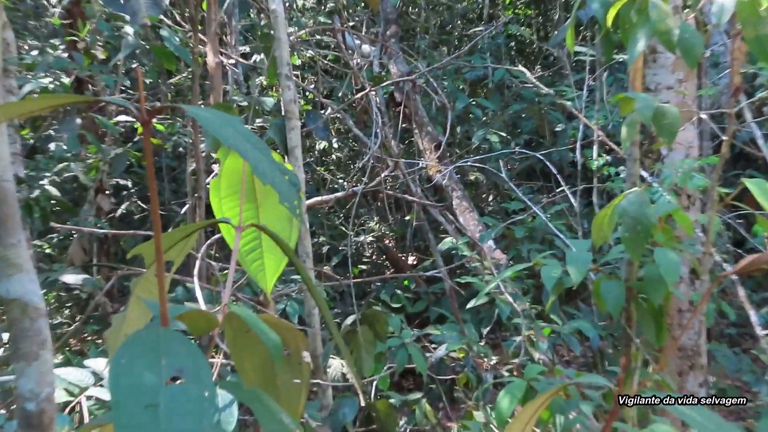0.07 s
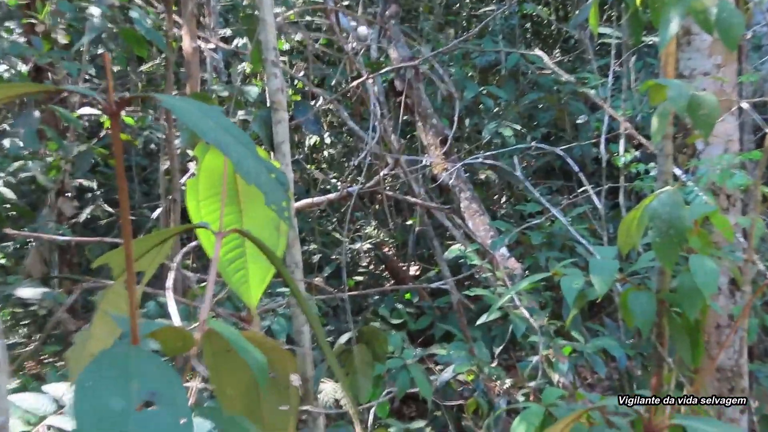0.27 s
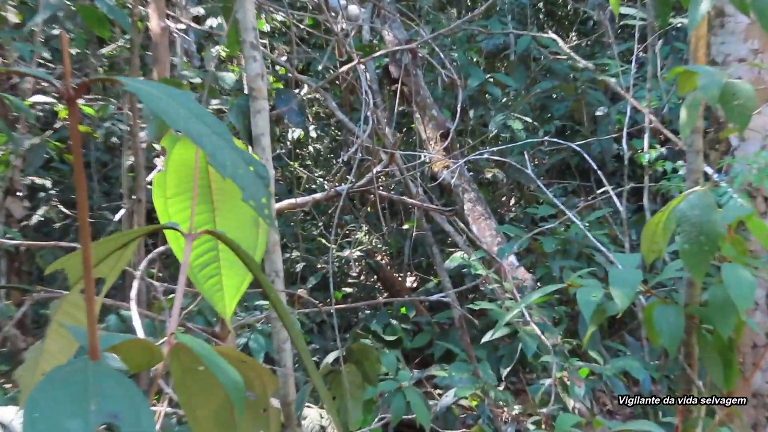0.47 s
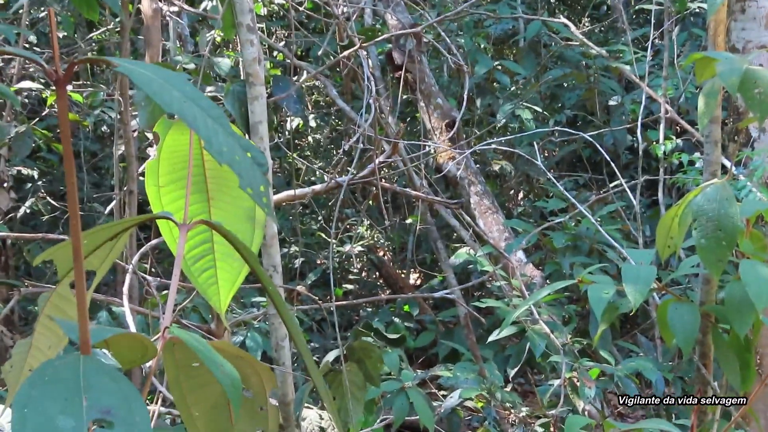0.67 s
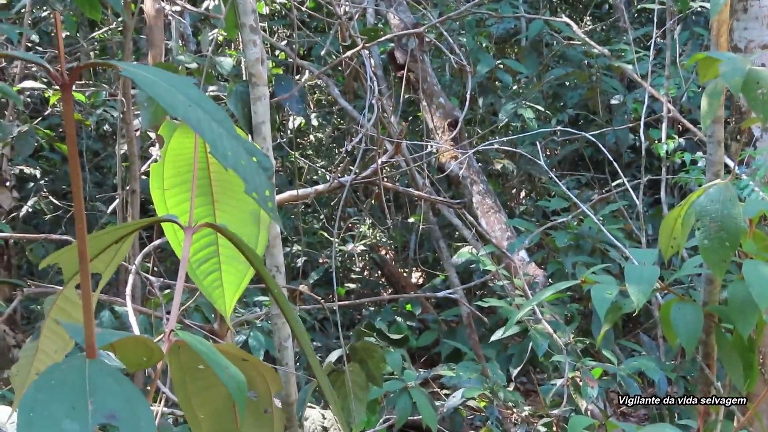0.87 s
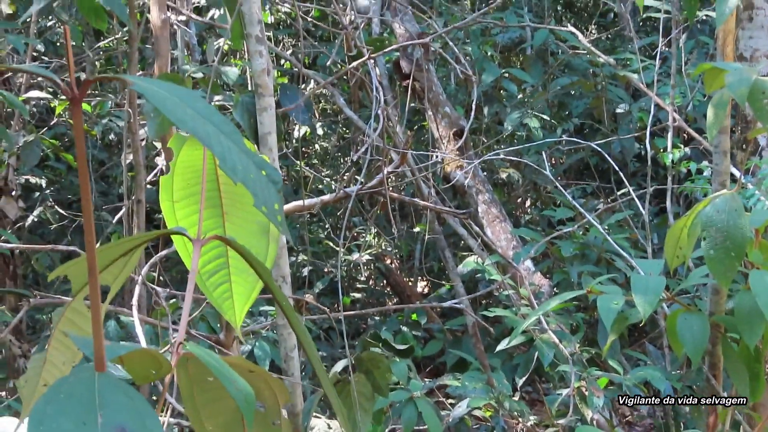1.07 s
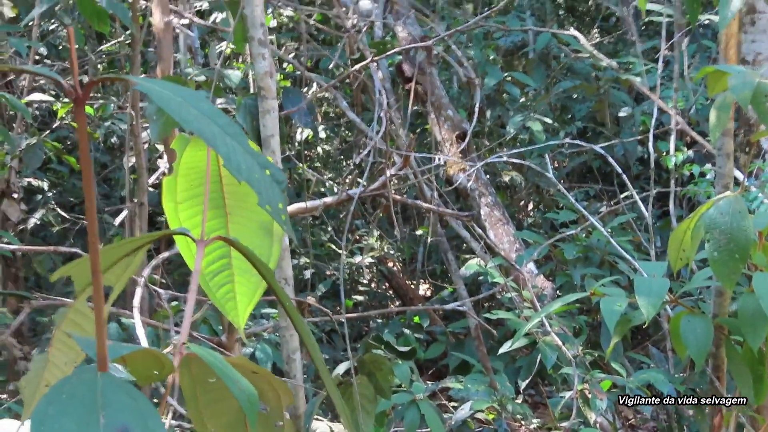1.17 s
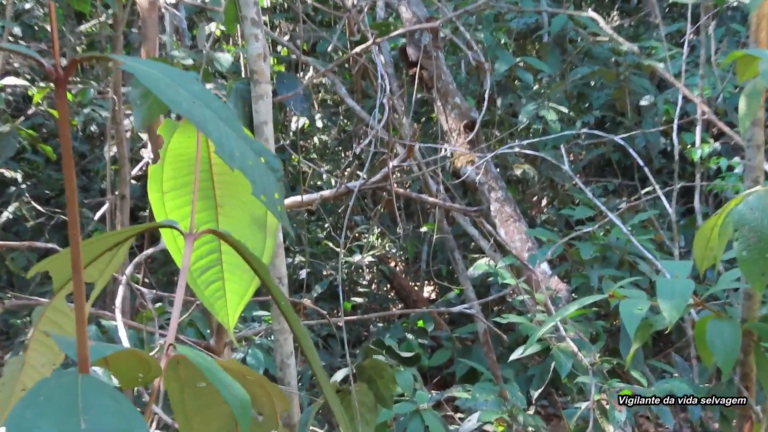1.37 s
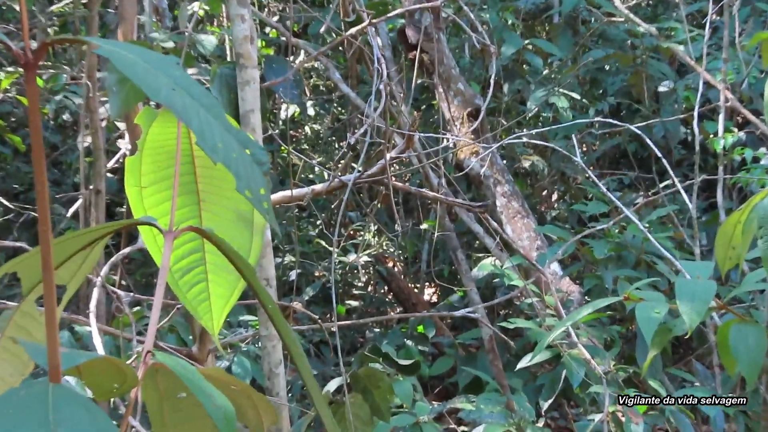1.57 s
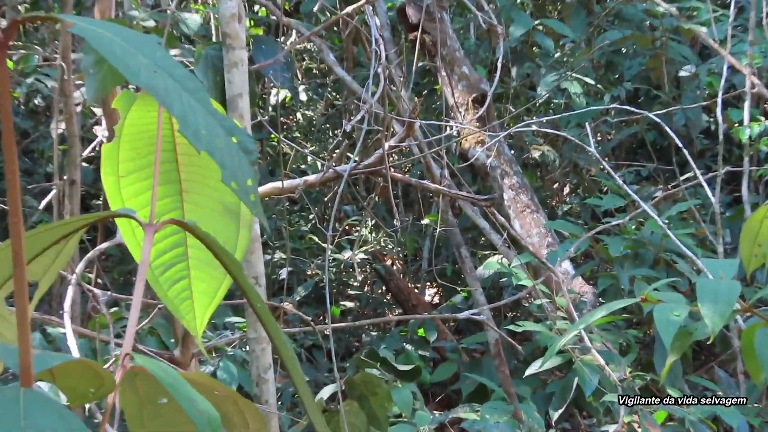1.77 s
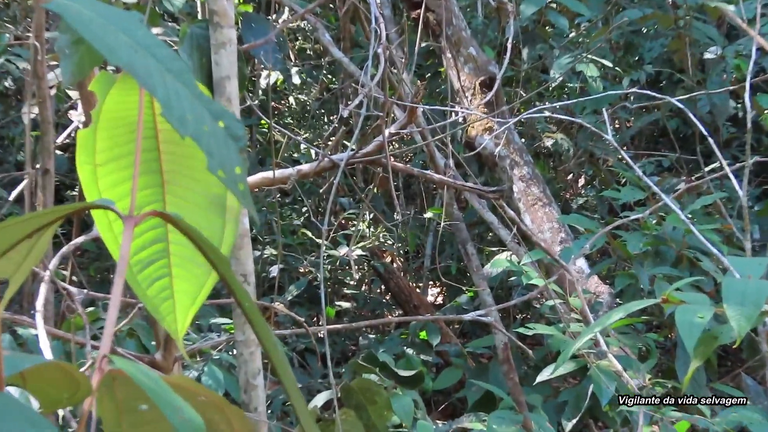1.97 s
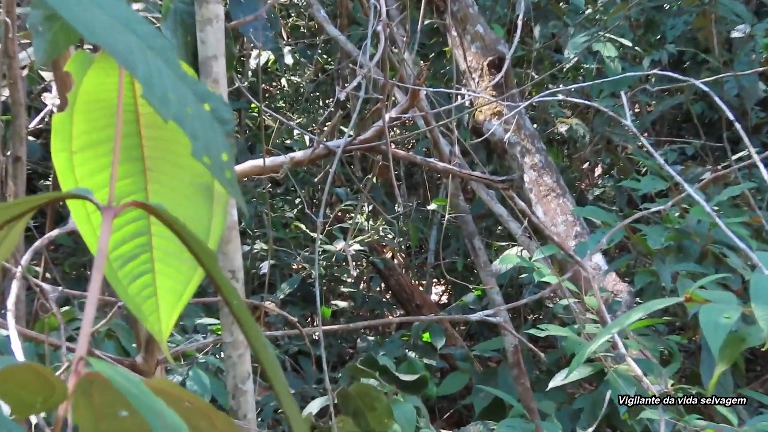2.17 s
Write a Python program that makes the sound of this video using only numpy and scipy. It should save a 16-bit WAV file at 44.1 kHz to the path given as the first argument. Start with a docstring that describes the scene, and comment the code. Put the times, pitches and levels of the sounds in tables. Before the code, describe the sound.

Small monkeys squeak and chuck in quick bursts among trees, over faint insects and leaf rustle

```python
"""A forest: monkeys call in thin whistles, falling buzzy chucks and low grunts, and once a twig snaps.
Whistles are near sines, chucks are partials smeared by noise, grunts are wavering tones with a rasp.
The trees return a long diffuse tail, made of decaying noise. A throbbing cricket tone and a cicada band
of filtered clicks sing over shaped noise for the hush, the rustle of leaves and the low rumble
of a hand-held camera, with a few soft bumps."""
import sys
import numpy as np
from scipy import signal
from scipy.fft import rfft, irfft
from scipy.io import wavfile
from scipy.ndimage import uniform_filter1d

SR = 44100
rng = np.random.default_rng(int(sys.argv[2]) if len(sys.argv) > 2 else 0)


def put_to_file(sound):
    """Save the sound as 16-bit audio at rate SR, in the file named by the first command-line argument."""
    columns = np.atleast_2d(sound).T  # one column per channel
    safe = np.clip(columns, -1, 1)
    whole_steps = np.round(safe * 32767)
    wavfile.write(sys.argv[1], SR, whole_steps.astype(np.int16))


def convert_level_to_amplitude(level_db):
    """Map a level in decibels to its linear amplitude factor."""
    exponent = np.asarray(level_db, float) / 20
    return 10 ** exponent


N = 99225

# Colour of the hush: (frequency [Hz], relative density [dB])
HUSH_COLOUR = [(15, -45), (30, 3), (60, -6), (130, -2), (400, -3.5), (540, -24), (720, -29), (1500, -41),
               (3000, -42), (5300, -67), (8000, -63), (9500, -72), (15500, -80)]
# Likeness of left and right in the air: (frequency [Hz], likeness [0-1])
AIR_LIKENESS = [(60, 1), (130, 0.75), (290, 0.16), (640, 0.8), (1410, 0.95), (3100, 0.82), (6820, 0.41),
                (15000, 0.09)]
# Rumble, the bass of the air: (time [s], level [dB])
RUMBLE_LEVEL = [(0.0, -46.5), (0.4, -47.5), (0.6, -39.5), (0.73, -53), (0.95, -48.5), (2.25, -49.5)]
# Rustle of leaves: (time [s], level [dB])
RUSTLE_LEVEL = [(0, -49), (.72, -54), (.74, -39.5), (.85, -42.5), (1.0, -41), (1.3, -38), (1.45, -39.5),
                (1.6, -43), (2.25, -51.5)]
# Colour of the rustle: (frequency [Hz], relative density [dB])
RUSTLE_COLOUR = [(500, 0.5), (1500, 0), (5000, -1.5), (8000, -9.5), (11000, -22), (15500, -17)]
# Cricket tone before its throb: (time [s], level [dB])
CRICKET_LEVEL = [(0, -55.5), (.3, -56), (0.549, -46), (.7, -54.5), (1.4, -49.5), (1.9, -54), (2.05, -50),
                 (2.25, -51.5)]
# Throb of the cricket, which evens out: (time [s], depth [0-1])
CRICKET_THROB = [(.3, .8), (.55, .3)]
# Cicada band: (time [s], level [dB])
CICADA_LEVEL = [(0, -54), (.5, -44.5), (1.1, -43), (1.7, -49.5), (2.25, -47.5)]
# Tone that fades in beside the cicada band: (frequency [Hz], amplitude [dB])
CICADA_TONE = [(6975, -44.5)]
# Bumps as the hand shifts on the camera: (time [s], drive level [dB])
HAND_BUMPS = [(0.066, -39.5), (0.364, -38.5), (0.53, -35), (0.587, -38)]
# Whistles, one list a call: (time [s], pitch [Hz], level [dB], level of the octave [dB])
WHISTLE_CALLS = [
    [(0.211, 4110, -41, -67), (0.235, 4378, -25.5, -41), (0.263, 4510, -26, -41), (0.275, 4436, -20.5, -35),
     (0.293, 4504, -28, -24), (0.303, 4264, -31, -34.5), (0.311, 4470, -26, -59)],
    [(0.492, 4250, -51, -70), (0.5, 4197, -32, -63), (0.516, 4270, -49.5, -36.5), (0.526, 4300, -30, -54),
     (0.532, 4350, -24.5, -51), (0.55, 4350, -26, -33), (0.56, 4440, -25, -34)],
    [(0.79, 4104, -31, -65), (0.8, 4205, -39.5, -40.5), (0.846, 4348, -26.5, -34.5),
     (0.856, 4326, -21, -35), (0.864, 4346, -25, -59), (0.874, 4355, -18.5, -25), (0.896, 4306, -36, -36)],
    [(1.094, 2880, -47, -45), (1.1, 3062, -29, -44), (1.108, 3200, -34, -63), (1.116, 3260, -49, -50)],
    [(1.117, 3790, -41, -51), (1.127, 3796, -26.5, -32), (1.152, 3727, -28, -43), (1.18, 3840, -32, -39.5),
     (1.213, 4040, -37.5, -33.5), (1.227, 4222, -32, -43), (1.249, 4180, -38, -35.5),
     (1.256, 4160, -25, -72)],
    [(1.553, 4090, -35, -66), (1.561, 4080, -29.5, -66), (1.581, 4200, -28, -35.5), (1.599, 4260, -37, -41),
     (1.613, 4233, -37, -40), (1.619, 4430, -25, -64), (1.625, 4400, -41, -54)],
    [(1.762, 6100, -35, -71), (1.786, 6054, -22.5, -49), (1.796, 6035, -42, -56), (1.81, 6210, -40, -43),
     (1.82, 6030, -31, -44), (1.842, 5980, -30, -48), (1.853, 5680, -33.5, -50), (1.86, 6030, -37, -60),
     (1.985, 6020, -43, -78)],
    [(2.104, 5700, -58, -86), (2.112, 5710, -40, -68), (2.128, 5636, -39.5, -74), (2.146, 5650, -36.5, -49),
     (2.152, 5430, -37, -45), (2.156, 4830, -39.5, -78), (2.162, 3570, -32, -59)],
    [(2.242, 4030, -48, -67), (2.25, 4000, -33, -68)],
]
# Scattering by the trees: (frequency [Hz], early T60 [s], late T60 [s], colour [dB])
FOREST_TAIL = [(586, 0.17, 1, 0), (1110, 0.12, 1.8, 7), (1500, 0.081, 0.5, -2), (1900, 0.44, 1.44, -0.5),
               (2690, 0.2, 2, -1), (5020, 0.32, 1.8, 0.5), (6200, 0.3, 2.44, -2.5), (10240, 0.16, 0.65, 3)]
# Likeness of left and right in the tail: (frequency [Hz], likeness [0-1])
TAIL_LIKENESS = [(600, 1), (2000, 0.9), (4500, 0.85), (8000, 0.29)]
# Grunts and clucks: (start [s], length [s], level [dB], low tone [Hz], high tone [Hz],
# high minus low [dB], rasp minus low [dB], width of the low tone [Hz])
GRUNT_CALLS = [(0.307, 0.012, -36.5, 1180, 1940, -24, -34, 201),
               (0.335, 0.021, -38.5, 1030, 1900, -27, -32, 322),
               (0.363, 0.064, -60, 1077, 1766, 8.5, -30, 60),
               (0.549, 0.0166, -40, 1176, 2600, -13, -6.5, 194),
               (.891, 0.015, -34, 1223, 3290, 2, -22, 243), (0.942, 0.03264, -16.5, 868, 2084, -7, -5, 191),
               (1.599, .055, -33, 763.4, 1722, 0, -20, 500), (2.159, 0.026, -37, 789, 3000, -1, -11, 367)]
# Noise in the low tone of each grunt: (share [0-1])
GRUNT_NOISE = [.4, .8, .5, .4, .6, .5, .95, .9]
# Chucks, one list a call: (time [s], pitch [Hz], level [dB], tilt [dB per octave])
CHUCK_CALLS = [
    [(0.309, 2106, -13, 22), (0.315, 1891, -21.5, -7), (0.321, 1450, -19, 5.5), (0.327, 1194, -32.5, -40),
     (0.333, 1060, -61, -11)],
    [(0.558, 2468, -14.5, -0.5), (0.582, 2465, -14, -1.5), (0.592, 2359, -21, -2.5), (0.6, 2071, -17.5, 1),
     (0.607, 1599, -17, 5.5), (0.612, 1254, -25.5, -6.5), (0.622, 1130, -25.5, -2.5)],
    [(0.895, 2371, -14, -16.5), (0.903, 2214, -19.5, 25), (0.909, 1971, -14.5, -3.5),
     (0.915, 1657, -19.5, 1.5), (0.921, 1296, -19, -6), (0.928, 970, -36, 3)],
    [(1.307, 2242, -30, -3), (1.319, 1902, -31.5, -4.5), (1.329, 1236, -42.5, 5), (1.335, 913, -19, -2.5)],
    [(1.625, 1610, -14, 3), (1.632, 1500, -21, 1), (1.639, 1143, -21.5, -1.5), (1.648, 1060, -25.5, -2)],
    [(1.903, 2523, -38, -31), (1.913, 2540, -32.5, -21), (1.922, 2410, -21.5, -18)],
    [(1.929, 1216, -29, -16), (1.935, 1057, -21, -2.5), (1.948, 1042, -41.5, -4),
     (1.956, 1029, -28.5, -8.5), (1.968, 1037, -37.5, -21), (1.98, 1040, -31.5, -6)],
    [(2.158, 1020, -36, 6), (2.172, 1025, -37, -4), (2.19, 936, -33.5, -2.5)],
]
# Roughness of each chuck's upper partials at low pitch: (roughness [0-1])
CHUCK_ROUGHNESS = [.7, .5, .55, .5, .6, .4, .9, .85]
# A distant, drawn-out chuck: (time [s], pitch [Hz], level [dB], tilt [dB per octave])
FAR_CHUCK_CALL = [(1.387, 2373, -25, 5.7), (1.41, 2417, -34.5, 2.4), (1.45, 2412, -39.5, 2.5),
                  (1.5, 2396, -44.5, 3.5), (1.575, 2414, -47, 4.4)]
# Resonance of the throat: (frequency [Hz], gain [dB])
THROAT_GAIN = [(800, 1.5), (1200, 5), (2000, -5), (2800, -15.5), (3400, 4.5), (4800, 1.5), (6500, 3),
               (7600, -3.5), (9000, -23.5), (10000, -20.5), (15000, -54)]
# Snapping twig: (time [s], level ahead of its filters [dB])
TWIG_SNAPS = [(1.275, -23)]
# Colour of the microphone: (frequency [Hz], gain [dB])
MIC_GAIN = [(20, -20), (45, -0.5), (8800, -2), (10000, -1), (12000, -2.5), (15500, -12)]


def evened(x):
    """Scales a signal to an rms of 1."""
    return x / np.sqrt(np.mean(abs(x) ** 2) + 1e-20)


def read(points, hz, column=1):
    """Reads a table column over log frequency."""
    table = np.transpose(points)
    return np.interp(np.log(hz + 1), np.log(table[0] + 1), table[column])


def level_at(points, t):
    """Gain over time from a (time, level) table."""
    return convert_level_to_amplitude(np.interp(t, *np.transpose(points)))


def add(mix, start, sound):
    """Lays a sound into the mix, cut at the mix's end."""
    part = mix[round(start * SR):][:len(sound)]
    part += sound[:len(part)]


def resonate(x, hz, width_hz):
    """Fixed resonance of gain 1: shifts the pitch to zero, smooths, shifts back."""
    turn = np.exp(2j * np.pi * hz * np.arange(x.shape[-1]) / SR)
    r = np.exp(-np.pi * width_hz / SR)
    return 2 * (turn * signal.lfilter([1 - r], [1, -r], x / turn)).real


def flutter(count, size):
    """Complex noise of unit power, smoothed over about size samples."""
    noise = rng.standard_normal((2, count + 2 * size))
    window = np.hanning(2 * size + 1)[None]
    a, b = signal.fftconvolve(noise, window, "valid", axes=1)
    return (a + 1j * b) / np.sqrt(1.5 * size)


def unfold(rows):
    """Start time, edge fade and columns of a call at sample rate."""
    edge_s = 0.0028
    table = np.transpose(rows)
    t = np.arange(table[0, 0], table[0, -1], 1 / SR)
    fade = np.clip(np.minimum(t - t[0], t[-1] - t) / edge_s, 0, 1)
    return t[0], fade, [np.interp(t, table[0], column) for column in table[1:]]


def air():
    """Hush, rumble and rustle: random short-time spectra with patchy levels, shaped by colour."""
    hush_db, bass_hz, patch_db = -55, 500, 1.22
    frames, hz = N // 256 + 5, np.fft.rfftfreq(1024, 1 / SR)
    t = np.arange(frames) * 256 / SR
    a, b, c, d, patches = rng.standard_normal((frames, 513, 5)).T
    patches = evened(uniform_filter1d(uniform_filter1d(patches, 10, 0), 6, 1))
    same = np.clip(read(AIR_LIKENESS, hz), -1, 1)[:, None]
    left = a + 1j * b
    right = same * left + np.sqrt(1 - same ** 2) * (c + 1j * d)
    spectra = np.array([left, right]) * convert_level_to_amplitude(patch_db * patches)

    low = 1 / (1 + (hz[:, None] / bass_hz) ** 8)
    hush = convert_level_to_amplitude(read(HUSH_COLOUR, hz))[:, None]
    rustle = convert_level_to_amplitude(read(RUSTLE_COLOUR, hz))[:, None]
    layers = ((hush * (1 - low), convert_level_to_amplitude(hush_db)),
              (hush * low, level_at(RUMBLE_LEVEL, t)),
              (rustle * (1 - low), level_at(RUSTLE_LEVEL, t)))
    power = sum((colour / np.linalg.norm(colour) * gain) ** 2 for colour, gain in layers)

    # plain noise through the same synthesis sets the unit of level
    plain = left[:, None].swapaxes(0, 1) / np.sqrt(len(hz))
    unit = np.std(signal.istft(plain, nperseg=1024, noverlap=768)[1])
    return signal.istft(spectra * np.sqrt(power), nperseg=1024, noverlap=768)[1][:, :N] / unit


def cricket():
    """A thin fluttering tone whose level throbs."""
    pitch_hz, throb_per_s, throb_peak_s = 3278, 16, 0.039
    t = np.arange(N) / SR
    depth = np.interp(t, *np.transpose(CRICKET_THROB))
    throb = 1 + depth * np.cos(2 * np.pi * throb_per_s * (t - throb_peak_s))
    tone = np.real(np.exp(2j * np.pi * pitch_hz * t) * (1 + 0.45 * flutter(N, size=900)))
    return level_at(CRICKET_LEVEL, t) * throb * np.sqrt(2) * tone


def cicada():
    """Random clicks ring two resonances in a row; a fluttering tone fades in beside the band."""
    band_hz, width_hz, clicks_per_s = 7093, 300, 1500  # width of each resonance, rate of each click train
    t = np.arange(N) / SR
    clicks = rng.standard_normal((3, N)) * (rng.random((3, N)) < clicks_per_s / SR)
    clicks = clicks[1:] + 1.2 * clicks[0]  # own clicks for each ear plus shared ones
    band = evened(resonate(resonate(clicks, band_hz, width_hz), band_hz, width_hz))
    tones = np.zeros((2, N))
    for hz, db in CICADA_TONE:
        for ear, phase in enumerate((1, 1j)):  # a quarter turn apart
            turn = np.exp(2j * np.pi * hz * t) * (1 + 0.5 * flutter(N, size=2000))
            tones[ear] += convert_level_to_amplitude(db) * np.real(turn * phase)
    fade_in = np.clip((t - 1.3) / 0.5, 0, 1)
    return level_at(CICADA_LEVEL, t) * band + fade_in * tones


def thumps():
    """Soft low bumps through the camera body: decaying sines with a softened start."""
    lowest_hz, t60_s, rise_s = 112, 0.12, 0.0099
    out, u = np.zeros(N), np.arange(SR // 5) / SR
    for start, db in HAND_BUMPS:
        hz = lowest_hz * rng.uniform(1.0, 1.03)
        shape = convert_level_to_amplitude(db - 60 * u / t60_s) * np.minimum(u / rise_s, 1)
        add(out, start, shape * 2 * np.sin(2 * np.pi * hz * u))
    return out


def whistle(rows):
    """A near sine with its octave and a faint third partial, all slightly rough."""
    third_db, roughness = -25.5, 0.073  # third partial against the octave
    start, fade, (hz, db, octave_db) = unfold(rows)
    turn = np.exp(2j * np.pi * np.cumsum(hz) / SR)
    turn = turn * (1 + roughness * flutter(len(hz), size=120))
    partials = convert_level_to_amplitude(db) * turn + convert_level_to_amplitude(octave_db) * turn ** 2 + convert_level_to_amplitude(octave_db + third_db) * turn ** 3
    return start, fade * np.sqrt(2) * partials.real


def forest(x):
    """Scattering by trunks and leaves: a quick and a slow noise decay, partly unlike left and right."""
    early_db, late_db = -3, -15.5  # before the onset fade
    sway_depth, sway_s = 1.2, 0.011  # moving leaves blur the tail's phase
    hz, t, z = signal.stft(rng.standard_normal((2, SR + SR // 2)), SR, nperseg=256)
    same = np.clip(read(TAIL_LIKENESS, hz), 0, 1)[:, None]
    shared, unlike = z[0] * np.sqrt(1 + same), z[1] * np.sqrt(1 - same)
    z = np.array([shared + unlike, shared - unlike])

    tail = 0
    for db, column in ((early_db, 1), (late_db, 2)):
        decay = convert_level_to_amplitude(-60 * t / read(FOREST_TAIL, hz, column)[:, None])
        part = signal.istft(z * decay, SR, nperseg=256)[1]
        tail = tail + convert_level_to_amplitude(db) * part / np.linalg.norm(part[0])
    tail = tail * np.clip(np.arange(tail.shape[1]) / SR / 0.0066 - 0.3, 0, 1)  # silent gap, then onset

    colour = read(FOREST_TAIL, np.fft.rfftfreq(len(x), 1 / SR), column=3)
    x = irfft(rfft(x) * convert_level_to_amplitude(colour), len(x))
    wet = signal.fftconvolve(x[None], tail, axes=1)[:, :N]
    sway = np.exp(1j * sway_depth * flutter(N, round(sway_s * SR)).real)
    return np.real(signal.hilbert(wet) * sway)


def wavering(hz, u, rough, width_hz):
    """A tone partly spread into narrow noise, at an rms of 1."""
    waver = np.sqrt(1 - rough ** 2) + rough * flutter(len(u), round(SR / width_hz / 2))
    return evened(np.real(np.exp(2j * np.pi * hz * u) * waver))


def grunt(start, length, db, low_hz, high_hz, high_db, rasp_db, width_hz, rough):
    """Wavering low and high tones with a rasp of noise, swelling and dying."""
    peak_at = 0.26  # share of the length
    high_rough, high_spread = 0.85, 1.6  # least noise share of the high tone, its width against the low
    rasp_hz, rasp_width_hz = 1600, 2200  # each of two resonances
    u = np.arange(0, length, 1 / SR)
    shape = np.sin(np.pi * (u / length) ** (np.log(0.5) / np.log(peak_at)))
    low = wavering(low_hz, u, rough, width_hz)
    high = wavering(high_hz, u, max(rough, high_rough), high_spread * width_hz)
    noise = rng.standard_normal(len(u))
    rasp = evened(resonate(resonate(noise, rasp_hz, rasp_width_hz), rasp_hz, rasp_width_hz))
    return start, shape * convert_level_to_amplitude(db) * (low + convert_level_to_amplitude(high_db) * high + convert_level_to_amplitude(rasp_db) * rasp)


def chuck(rows, hoarse, clear_share=0.2):
    """A stack of partials through the throat; roughness smears each, more as the pitch sinks."""
    hoarse_hz, clear_hz = 1850, 2400  # fully hoarse below, only clear_share of it above
    root_share = 0.45  # the fundamental keeps clearer than the upper partials
    start, fade, (hz, db, tilt_db) = unfold(rows)
    k = np.arange(1, 13)[:, None]
    weight = convert_level_to_amplitude(read(THROAT_GAIN, k * hz) + tilt_db * np.log2(k)) * (k * hz < SR / 3)
    weight /= np.sqrt((weight ** 2).sum(0) / 2)
    rough = np.clip(hoarse * np.interp(hz, [hoarse_hz, clear_hz], [1, clear_share]), 0, 1)
    rough = rough * np.where(k == 1, root_share, 1)
    noise = np.array([flutter(len(hz), size=24) for _ in k])
    smear = np.sqrt(1 - rough ** 2) + rough * noise
    turn = np.exp(2j * np.pi * (k * np.cumsum(hz) / SR + rng.random(k.shape)))
    return start, fade * convert_level_to_amplitude(db) * (weight * smear * turn).real.sum(0)


def twig_snap(db):
    """A dying burst of noise through two broad resonances."""
    t60_s = 0.0074
    burst = resonate(resonate(rng.standard_normal(400), 4600, 5000), 4300, 5000)
    return convert_level_to_amplitude(db - 60 * np.arange(400) / SR / t60_s) * burst


def ports(calls):
    """Around one pitch the microphone's two ports hear unlike phases."""
    port_hz, width_hz, side_db = 8850, 2100, -13.5
    side = convert_level_to_amplitude(side_db) * np.roll(resonate(calls, port_hz, width_hz), 1)
    return np.array([calls + side, calls - side])


def scene():
    """Near and far calls, their forest tail, and the air, insects and bumps around them."""
    voice_floor_hz, far_direct_db, far_hoarse = 447, -3, 0.7
    calls, far = np.zeros((2, N))
    for rows in WHISTLE_CALLS:
        add(calls, *whistle(rows))
    for row, rough in zip(GRUNT_CALLS, GRUNT_NOISE):
        add(calls, *grunt(*row, rough))
    for rows, hoarse in zip(CHUCK_CALLS, CHUCK_ROUGHNESS):
        add(calls, *chuck(rows, hoarse))
    for start, db in TWIG_SNAPS:
        add(calls, start, twig_snap(db))
    add(far, *chuck(FAR_CHUCK_CALL, far_hoarse, clear_share=1))  # equally rough at any pitch
    calls = signal.sosfilt(signal.butter(4, voice_floor_hz, "high", fs=SR, output="sos"), calls)
    direct = ports(calls) + convert_level_to_amplitude(far_direct_db) * far
    return direct + forest(calls + far) + air() + cricket() + cicada() + thumps()


def low_pass(x):
    """Removes everything above the highest recorded frequency."""
    return signal.sosfilt(signal.butter(12, 15630, fs=SR, output="sos"), x)


def record(dry):
    """Colours the mix as the microphone does."""
    colour = convert_level_to_amplitude(read(MIC_GAIN, np.fft.rfftfreq(N, 1 / SR)))
    coloured = irfft(rfft(dry) * colour, N)
    return low_pass(coloured)


dry = scene()
out = record(dry)
put_to_file(out)
```